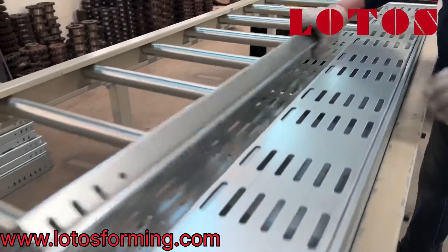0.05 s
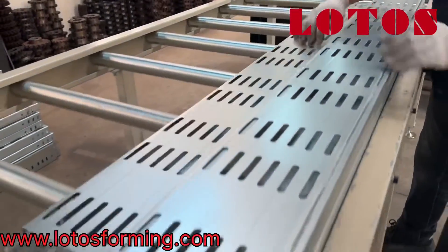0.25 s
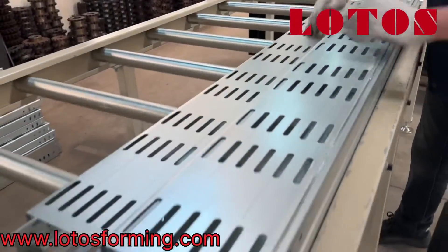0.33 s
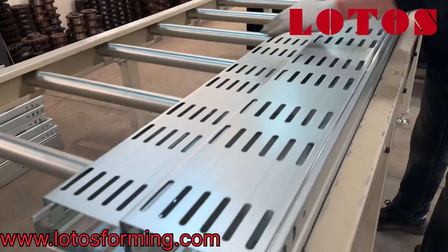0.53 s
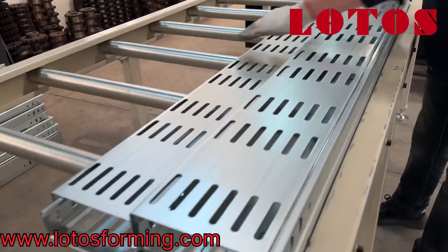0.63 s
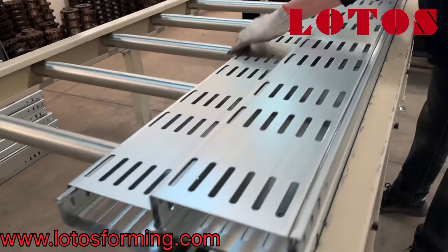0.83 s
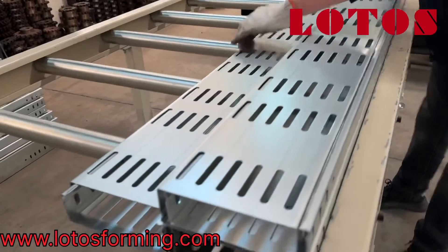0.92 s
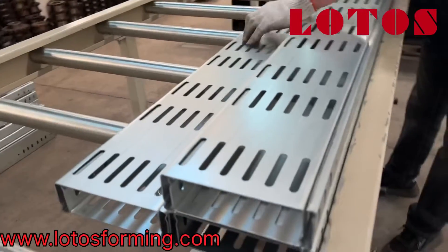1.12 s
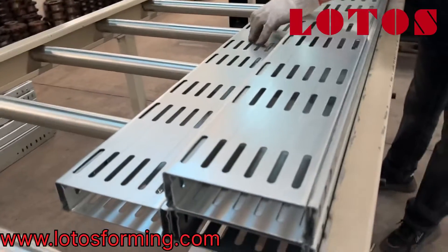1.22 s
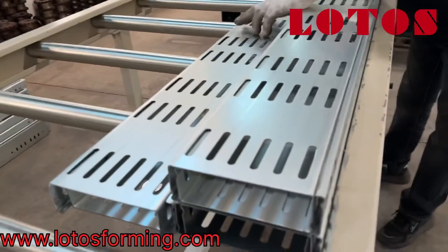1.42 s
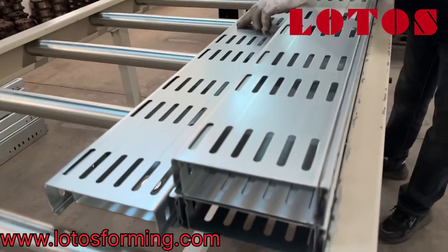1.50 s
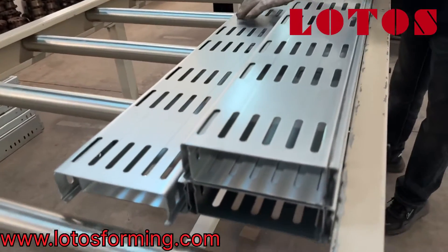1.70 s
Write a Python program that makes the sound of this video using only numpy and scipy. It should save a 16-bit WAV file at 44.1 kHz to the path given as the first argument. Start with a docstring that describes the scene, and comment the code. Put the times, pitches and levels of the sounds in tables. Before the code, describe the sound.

A long thin steel tray slams onto another with a harsh, chattering clang that rings on, then scrapes into place with a few light, damped clanks, over a droning factory hall, close microphone overloaded by the hit.

```python
"""A factory hall drones with a thin whine and a faint scrape; then a perforated sheet-steel cable tray is flipped
onto another on a roller table: it touches, slams down and chatters, ringing. It is slid into place with a scrape
and a few light, damped clanks. Blows excite noise bursts and decaying modes, random slips make the scrape, and
filtered noise and unsteady sines make the machines. One microphone; the slam drives the recorder's limiter.
"""
import sys
import numpy as np
from scipy import signal
from scipy.fft import rfft, irfft, next_fast_len
from scipy.io import wavfile
from scipy.ndimage import uniform_filter1d, minimum_filter1d, map_coordinates

SR = 44100
rng = np.random.default_rng(int(sys.argv[2]) if len(sys.argv) > 2 else 0)


def dump(signal):
    """Clip the signal to [-1, 1] and save it as 16-bit WAV at the path in sys.argv[1]."""
    limited = np.clip(np.atleast_2d(signal).T, -1, 1)
    pcm = np.round(limited * 32767).astype(np.int16)
    wavfile.write(sys.argv[1], SR, pcm)


N = 77175  # samples, 1.75 s

# Machines in the hall: overall drone level [t/s, level/dB]
DRONE_LEVEL = [(0, -33), (.2, -36), (.8, -38), (1.05, -38.5), (1.25, -37.5), (1.4, -40), (1.75, -40.5)]
# Colour of the drone [f/Hz, relative density/dB per Hz]
DRONE_COLOUR = [(30, -32), (110, -14), (170, -4.5), (270, -4), (350, -3), (570, -3.5), (700, -7),
                (970, -14), (1400, -18), (2500, -23), (4000, -30), (5300, -36.5), (6000, -31), (7000, -34),
                (9000, -40), (12000, -54), (15500, -68)]
# Hum lines, before the common lift HUM_LIFT_DB [f/Hz, level/dB]
HUM_LINES = [(344.5, -62), (446.8, -54.5), (570.6, -51.5)]
# Thin whine of motor drives, each line with its own start [t/s, f/Hz, level/dB]
WHINE_LINES = [(0, 5965, -65), (0, 6062, -65), (1.54, 5940, -65), (1.62, 5700, -66), (1.64, 5810, -74)]
HUM_LIFT_DB, HUM_WANDER_HZ = 2, 4.6
WHINE_RISE_S, WHINE_WANDER_HZ = .05, 18

# Sliding friction of steel on steel [t/s, level/dB]
SLIDE_LEVEL = [(0, -39.5), (.06, -38.5), (.12, -44.5), (.2, -41.5), (.5, -33.5), (.8, -39), (1.0, -40.5),
               (1.13, -44.5), (1.28, -49.5), (1.42, -49), (1.55, -51), (1.75, -80)]
# Colour of the scrape [f/Hz, relative density/dB per Hz]
SCRAPE_COLOUR = [(300, -1), (800, 3), (1500, 4.5), (2600, 4), (3600, -2), (5000, -6.5), (8500, -16.5),
                 (10000, -25.5), (12000, -42), (15500, -48.5)]
# Tiny squeaks of edge on edge, at their peaks [t/s, level/dB]
SQUEAKS = [(.70, -59), (.772, -60), (1.268, -56.5)]
SLIPS_PER_S, SLIP_T60_S, SLIP_SPREAD_DB = 550, 0.09, 2
SQUEAK_HZ, SQUEAK_WIDTH_HZ, SQUEAK_S = 8150, 750, .004  # width and duration are Gaussian sigmas

# The falling tray's blows, later ones mostly softer and duller [t/s, level/dB, treble tilt/dB per octave]
SLAM_BLOWS = [(.213, -25.5, 2), (.229, -2.5, -1), (.238, -6, -1), (.264, -6, .5), (.283, -9.5, 0),
              (.303, -14.5, -0.5), (.349, -18, -5), (.357, -17.5, -3), (.398, -20.5, -5), (.422, -20, -2)]
# The tray's strongest modes, level relative to the blow [f/Hz, level/dB, t60/s]
TRAY_MODES = [(399.4, -30.5, 0.96), (742.3, -24, 1.22), (852, -29.5, 1.13), (1091, -27, 1.27),
              (1157.5, -23.5, 0.87), (1418, -26, 1), (1848, -17.5, .8), (2012, -23, 0.36),
              (2127, -24, 0.53), (2260, -34, 0.29), (2434, -23.5, 0.87), (2540, -20.5, 0.64),
              (2653, -15.5, 0.47), (2735, -19.5, 0.23), (2827, -17.5, 0.71), (3520, -24, 0.82),
              (3716, -20, 0.21), (3910, -22, 0.78), (4053, -16, 0.27), (4640, -38, 0.91), (5320, -26, 0.66),
              (6670, -31, .45)]
# The sheet's countless weaker modes, as a colour [f/Hz, relative density/dB per Hz]
SHEET_COLOUR = [(40, -37), (120, -39), (260, -21), (420, -10.5), (560, -8), (760, -8), (960, -12),
                (1400, -8.5), (1900, -1.5), (2600, -0.5), (3250, -4), (4100, -4), (4800, -9.5), (6000, -14),
                (8500, -17), (15500, -28.5)]
# Ring time of the sheet [f/Hz, t60/s]
SHEET_RING = [(150, 0.49), (700, 0.71), (1400, 0.73), (2500, 0.67), (4000, 0.64), (8000, .57), (14000, 0.3)]
WASH_DB, CRACK_DB, CRACK_T60_S = -1, -1.5, 0.048
MODE_WANDER_HZ, BEAT_HZ, BEAT_DEPTH = 6.98, 11.05, 0.57
MINOR_LO_HZ, MINOR_HI_HZ = 702.4, 5488
MINOR_DB, MINOR_SCATTER_DB = -22.5, 1
MINOR_T60_SPREAD = 0.09  # sigma of the natural log of t60

# Light clanks of the nested trays [t/s, level/dB, treble tilt/dB per octave]
CLANK_BLOWS = [(.699, -31, -4), (.876, -37, -0.5), (.884, -24, 0.5), (.895, -25, -0.7), (.913, -28.5, -4),
               (1.050, -40, 1.5), (1.179, -38, 0), (1.192, -40, -3.5), (1.452, -37.5, 2.5),
               (1.464, -38, 0.5), (1.486, -47, 2)]
# The same steel damped by the stack and a gloved hand [f/Hz, relative density/dB per Hz]
DAMPED_COLOUR = [(150, -30), (700, -9), (1400, -8), (2050, -1), (2900, -2), (3600, -10), (4400, -8.5),
                 (5300, -15), (8000, -20), (11000, -29.5), (13000, -40), (15500, -48)]
# Short pings of the damped steel, around these pitches [f/Hz, peak level/dB]
DAMPED_PINGS = [(2000, -8), (2680, -5), (3150, -9)]
PING_SCATTER_HZ, DAMPED_T60_S = 35.6, 0.14
DAMPED_HALL_DB, HALL_T60_S = -12.5, 0.4

ATTACK_S, TILT_PIVOT_HZ = 0.00071, 2500
CEILING, LIMIT_S = 1.02, 0.00033  # ceiling as a multiple of full scale
LOW_CUT_HZ, TOP_HZ = 103, 15700


def amp(db):
    """Decibels to gain."""
    return 10 ** (np.asarray(db) / 20)


def unit(x):
    """Scale to rms 1."""
    return x / np.sqrt(np.mean(x ** 2) + 1e-20)


def along(points, hz):
    """Read (Hz, value) points on a log frequency axis."""
    f, v = np.transpose(points)
    return np.interp(np.log(hz + 1), np.log(f + 1), v)


def clock():
    """The time of each sample in seconds."""
    return np.arange(N) / SR


def level(rows):
    """Gain per sample from (s, dB) points."""
    return amp(np.interp(clock(), *np.transpose(rows)))


def filtered(x, response):
    """Multiply the spectrum of x by a response of frequency."""
    size = next_fast_len(N + SR // 2)
    return irfft(rfft(x, size) * response(np.fft.rfftfreq(size, 1 / SR)), size)[:N]


def noise(colour, tilt_db=0):
    """Coloured noise of rms 1, tilted by dB per octave about the pivot."""
    def response(hz):
        octaves = np.log2(np.maximum(hz / TILT_PIVOT_HZ, .5))  # no further tilt an octave below the pivot
        return amp(along(colour, hz) + tilt_db * octaves)
    return unit(filtered(rng.standard_normal(N), response))


def fade(t, t60):
    """Exponential decay, 60 dB down after t60 seconds."""
    return np.exp(-np.log(1000) * t / np.maximum(t60, 1e-3))


def add(track, s, sound):
    """Mix a struck sound in at time s, with a short attack."""
    start = max(round(s * SR), 0)
    struck = sound * (1 - np.exp(-clock() / ATTACK_S))
    track[start:] += struck[:N - start]


def tone(hz, wander_hz):
    """A sine of rms 1 whose pitch drifts between random points, 40 a second."""
    drift = np.interp(clock() * 40, np.arange(80), rng.standard_normal(80))
    cycles = np.cumsum(hz + wander_hz * drift) / SR
    return np.sqrt(2) * np.sin(2 * np.pi * (cycles + rng.random()))


def machines():
    """Rotating machinery gives a broad noise drone with humming lines; motor drives add a thin whine."""
    hum = sum(amp(db) * tone(hz, HUM_WANDER_HZ) for hz, db in HUM_LINES)
    whine = np.zeros(N)
    for s, hz, db in WHINE_LINES:
        rise = np.clip((clock() - s) / WHINE_RISE_S, 0, 1)
        whine += amp(db) * rise * tone(hz, WHINE_WANDER_HZ)
    return level(DRONE_LEVEL) * noise(DRONE_COLOUR) + amp(HUM_LIFT_DB) * hum + whine


def scrape():
    """Steel slides on steel: tiny slips ring the sheet, and now and then an edge squeaks."""
    t = clock()
    slips = (rng.random(N) < SLIPS_PER_S / SR) * amp(SLIP_SPREAD_DB * rng.standard_normal(N))
    # each slip's energy decays; the end of the sum wraps round to the start
    energy = np.abs(irfft(rfft(slips ** 2) * rfft(fade(t, SLIP_T60_S) ** 2), N))
    rub = unit(np.sqrt(energy) * noise(SCRAPE_COLOUR))

    def squeak_band(hz):
        return np.exp(-.5 * ((hz - SQUEAK_HZ) / SQUEAK_WIDTH_HZ) ** 2)
    squeal = unit(filtered(rng.standard_normal(N), squeak_band))
    catches = sum(amp(db) * np.exp(-.5 * ((t - s) / SQUEAK_S) ** 2) for s, db in SQUEAKS)
    return level(SLIDE_LEVEL) * rub + catches * squeal


def slam():
    """The long tray lands edge by edge and chatters to rest; each blow feeds decaying modes that beat."""
    out, blows, t = np.zeros(N), np.zeros(N), clock()
    for s, db, tilt_db in SLAM_BLOWS:
        add(out, s, amp(db) * sheet_ring(tilt_db))
        blows[round(s * SR)] += amp(db) ** 2
    blows = np.abs(uniform_filter1d(blows, size=40))  # spread each blow's energy over 40 samples
    for hz, db, t60 in list(TRAY_MODES) + minor_modes(count=36):
        energy = signal.lfilter([1], [1, -fade(1 / SR, t60) ** 2], blows)
        beat_hz = BEAT_HZ * (.5 + rng.random())
        beat = 1 + BEAT_DEPTH * np.sin(2 * np.pi * (beat_hz * t + rng.random()))
        out += amp(db) * np.sqrt(energy) * beat * tone(hz, MODE_WANDER_HZ)
    return out


def sheet_ring(tilt_db):
    """One blow: a crack and the dense noise wash of sheet modes, each band dying at its own rate."""
    hz, s, z = signal.stft(noise(SHEET_COLOUR, tilt_db), SR, nperseg=512)
    decaying = z * fade(s, along(SHEET_RING, hz)[:, None])
    wash = signal.istft(decaying, SR, nperseg=512)[1][:N]
    crack = fade(clock(), CRACK_T60_S) * noise(SHEET_COLOUR, tilt_db + 3.5)  # brighter than the wash
    return amp(WASH_DB) * wash + amp(CRACK_DB) * crack


def minor_modes(count):
    """The sheet's middling modes, scattered over its ringing range: rows of (Hz, dB, t60 s)."""
    place = (np.arange(count) + rng.random(count)) / count
    hz = MINOR_LO_HZ + (MINOR_HI_HZ - MINOR_LO_HZ) * place
    size, life = rng.standard_normal((count, 2)).T
    db = MINOR_DB + along(SHEET_COLOUR, hz) + MINOR_SCATTER_DB * size
    t60 = along(SHEET_RING, hz) * np.exp(MINOR_T60_SPREAD * life)
    return list(zip(hz, db, t60))


def clanks():
    """The held tray knocks against its neighbour: a short ring with pings, and the hall's longer tail."""
    out, t = np.zeros(N), clock()
    for s, db, tilt_db in CLANK_BLOWS:
        pings = np.zeros(N)
        for hz, ping_db in DAMPED_PINGS:
            pings += amp(ping_db) * np.sin(2 * np.pi * rng.normal(hz, PING_SCATTER_HZ) * t)
        ring = fade(t, DAMPED_T60_S) * (noise(DAMPED_COLOUR, tilt_db) + pings)
        tail = fade(t, HALL_T60_S) * noise(DAMPED_COLOUR, tilt_db - 0.5)  # slightly duller
        add(out, s, amp(db) * (ring + amp(DAMPED_HALL_DB) * tail))
    return out


def scene():
    """Hall and trays at one microphone."""
    return (machines() + scrape() + slam() + clanks())[None]


def record(dry):
    """The recorder: a fast limiter that flattens the slam, then a low cut and a steep top limit."""
    size = max(int(LIMIT_S * SR), 3)
    needed = CEILING / np.maximum(np.abs(dry[0]), CEILING)
    gain = uniform_filter1d(minimum_filter1d(needed, size), size)

    def band(hz):
        low_cut = hz ** 2 / np.hypot(hz ** 2, LOW_CUT_HZ ** 2)
        return low_cut / np.sqrt(1 + (hz / TOP_HZ) ** 240)
    return filtered(dry[0] * gain, band)[None]


dry = scene()
out = record(dry)
dump(out)
```